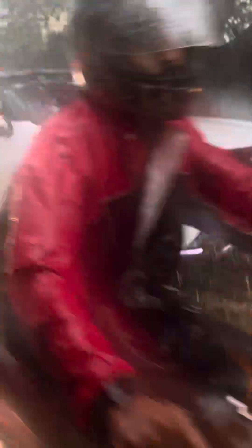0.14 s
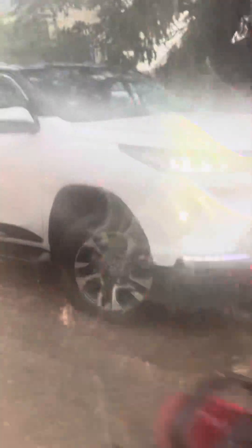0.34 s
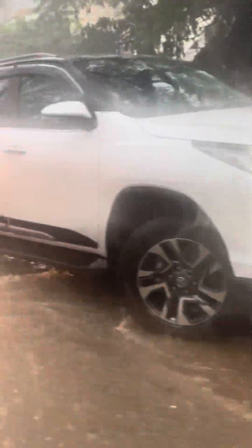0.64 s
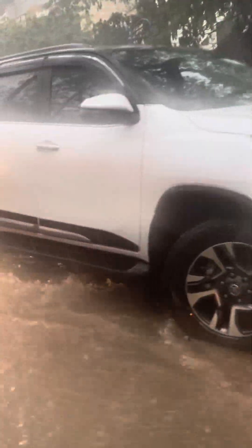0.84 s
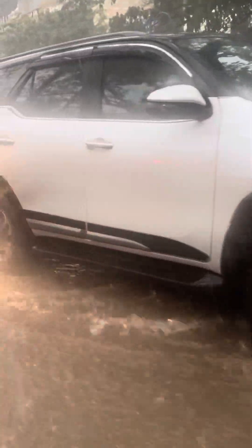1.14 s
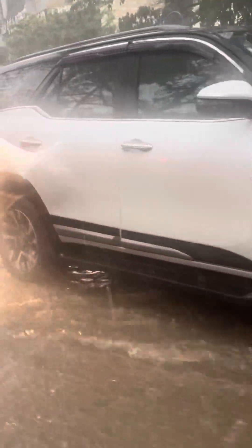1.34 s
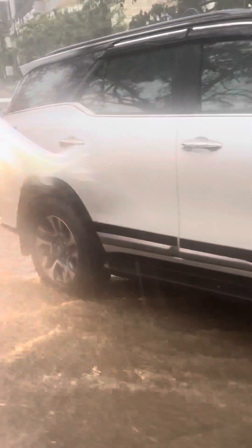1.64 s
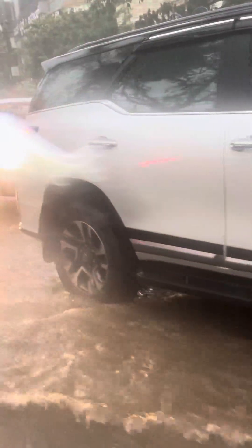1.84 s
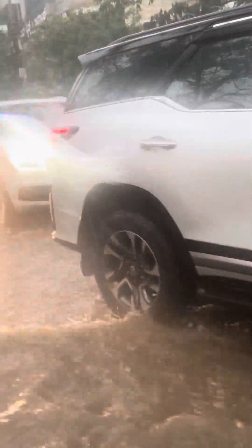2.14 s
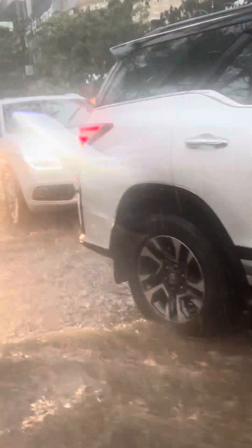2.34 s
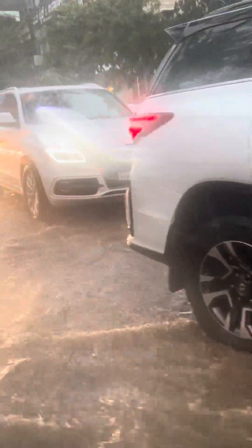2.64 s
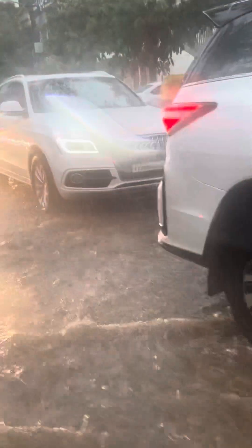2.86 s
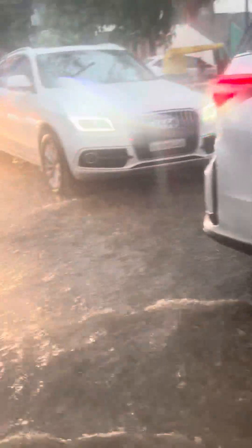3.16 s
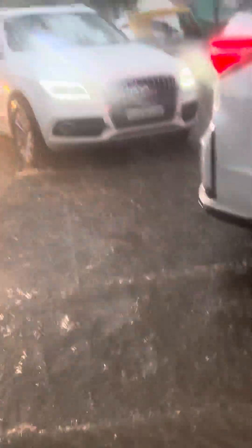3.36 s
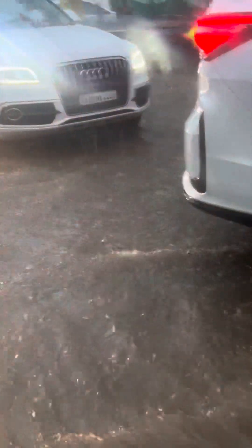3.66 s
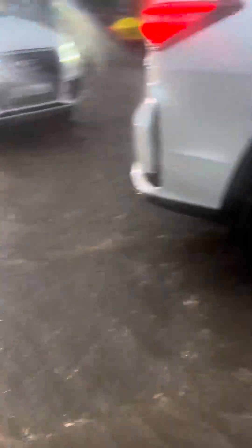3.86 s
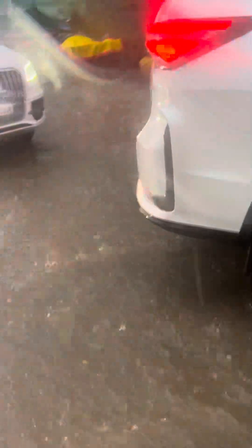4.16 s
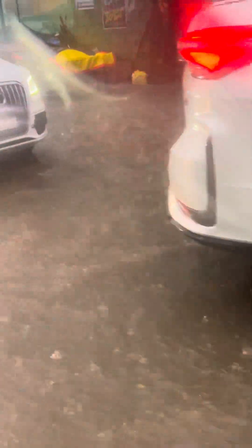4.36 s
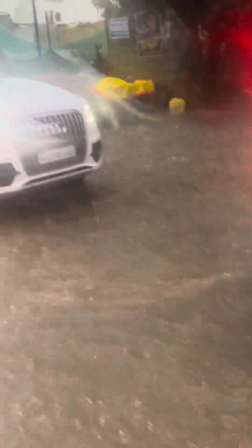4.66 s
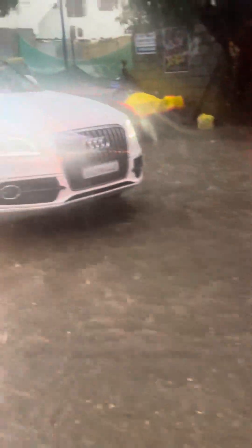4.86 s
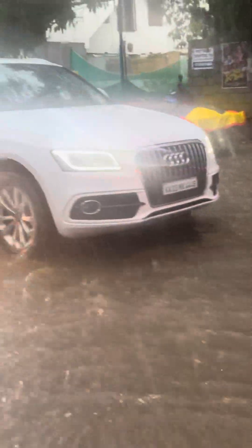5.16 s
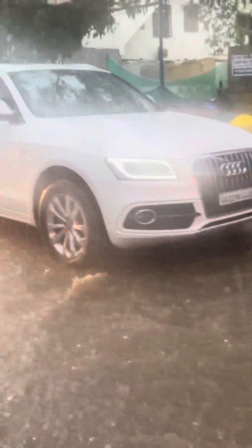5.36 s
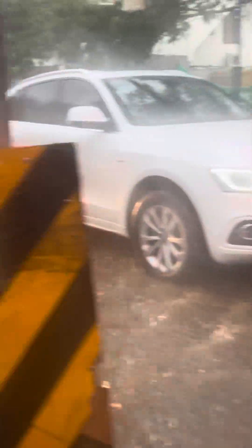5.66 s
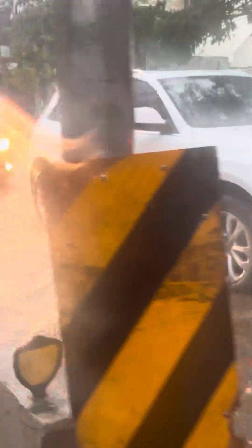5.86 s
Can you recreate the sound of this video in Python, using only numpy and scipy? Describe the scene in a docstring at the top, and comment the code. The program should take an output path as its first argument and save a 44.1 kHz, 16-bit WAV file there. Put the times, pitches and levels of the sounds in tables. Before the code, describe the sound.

Rain and sloshing floodwater make a steady, muffled wash around a microphone inside a slowly moving vehicle, its engine droning through the floor and drops pattering on the bodywork. Early on a motorcycle pulls away, a few soft thumps come from below and a faraway horn holds a thin note. A car passes with a low hum, a heavy drop smacks the panel, then a full, nearby horn sounds once before further drops and a thump.

```python
"""Rain on a flooded street from inside a slow vehicle, dull and boomy through the bodywork.
Throughout, tyres push through water, the engine drones and drops chirp on a body panel.
A motorcycle leaves at the start and a car passes (0.4-3.9 s); the floor bumps (0.5-1 s) as a thin
far horn sounds (0.6-1.7 s). The largest drop snaps at 2.9 s. A full near horn buzzes (4.5-5.2 s),
then come more large drops and a last bump."""
import sys
import numpy as np
from scipy import signal
from scipy.fft import rfft, irfft, next_fast_len
from scipy.io import wavfile
from scipy.ndimage import uniform_filter1d

SR = 44100
rng = np.random.default_rng(int(sys.argv[2]) if len(sys.argv) > 2 else 0)


def put_to_file(sound):
    """Save the sound as 16-bit audio at rate SR, in the file named by the first command-line argument."""
    columns = np.atleast_2d(sound).T  # one column per channel
    safe = np.clip(columns, -1, 1)
    whole_steps = np.round(safe * 32767)
    wavfile.write(sys.argv[1], SR, whole_steps.astype(np.int16))


N = 264730

# phase lead of the left microphone: f/Hz, lead/rad
LEFT_LEAD = [(0, -1.5), (250, 0.22), (600, 2), (860, 2.5), (1550, 5), (2150, 8), (2600, 10), (3500, 6.5),
             (4390, 7.5), (5500, 9), (6400, 11), (7500, 12.5), (9200, 14.5)]


def amp(db):
    return 10 ** (np.asarray(db) / 20)


def unit_rms(x):
    return x / np.sqrt(np.mean(x ** 2) + 1e-20)


def at_hz(rows, hz):
    """Table value at hz, on a log frequency axis."""
    f, value = np.transpose(rows)
    return np.interp(np.log(hz + 1), np.log(f + 1), value)


def at_times(rows, t):
    """Table columns at times t."""
    times, *cols = np.transpose(rows)
    return [np.interp(t, times, c) for c in cols]


def curves(rows):
    """Start/s and per-sample columns of a time table."""
    t = np.arange(rows[0][0], rows[-1][0], 1 / SR)
    return t[0], at_times(rows, t)


def add(mix, start_s, sound):
    part = mix[:, round(start_s * SR):][:, :sound.shape[1]]
    part += sound[:, :part.shape[1]]


def drift(size, top_hz):
    """Random wander, rms 1, up to top_hz."""
    t = np.arange(size) / SR
    rates_hz = np.geomspace(top_hz / 8, top_hz, 8)
    return unit_rms(sum(np.sin(2 * np.pi * (f * t + rng.random())) for f in rates_hz))


def partial(k, hz, db, pan_db, lead_rad=None, start_turns=None):
    """Stereo harmonic k of a pitch curve; pan is left minus right."""
    phase = 2 * np.pi * (k * np.cumsum(hz) / SR + (rng.random() if start_turns is None else start_turns))
    if lead_rad is None:
        lead_rad = at_hz(LEFT_LEAD, k * np.mean(hz))
    left = amp(db + pan_db / 2) * np.sin(phase + lead_rad / 2)
    right = amp(db - pan_db / 2) * np.sin(phase - lead_rad / 2)
    return np.sqrt(2) * np.array([left, right])


def cabin(common, separate):
    """Two independent noises, dulled by the bodywork and made partly coherent."""
    colour = [(20, -42), (40, -10.5), (70, -1), (130, -10), (280, -14.5), (380, -20.5), (750, -17.5),
              (1150, -21), (1500, -24), (2450, -40), (4700, -53), (6600, -63), (9500, -72.5),
              (10300, -88.5), (13500, -102)]  # spectrum: f/Hz, relative density/dB
    resonances = [(944, 77, 6), (5500, 210, -10.5)]  # cabin ring and shadow: f/Hz, width/Hz, gain/dB
    coherence = [(60, 0.94), (110, 1), (200, 0.69), (370, 0.79), (680, 0.041), (1250, 0.073), (2290, 0.57),
                 (4200, 0.21), (5200, 1), (6200, 0.5), (7500, 0.97), (9000, 0.52)]  # f/Hz, left-right coherence
    balance = [(60, -2), (120, 3), (250, 3.5), (500, 7), (1020, 4.5), (2070, -1.5), (4200, 1.5),
               (5500, -1.5), (8000, 1)]  # f/Hz, pan/dB
    size = next_fast_len(N)
    common, separate = rfft(common, size), rfft(separate, size)
    hz = np.fft.rfftfreq(size, 1 / SR)
    db = at_hz(colour, hz) + sum(gain / (1 + ((hz - f) / width) ** 2) for f, width, gain in resonances)
    alike, pan_db = at_hz(coherence, hz), at_hz(balance, hz)
    lagged = common * np.exp(-1j * at_hz(LEFT_LEAD, hz))
    left = common * amp(db + pan_db / 2)
    right = (alike * lagged + np.sqrt(1 - alike ** 2) * separate) * amp(db - pan_db / 2)
    return irfft(np.array([left, right]), size)[:, :N]


def water(level_db=-26.5, patchy_db=1.57, flicker_db=1.0):
    """Rain and tyre noise: four bands swell apart, splashes flicker the treble."""
    levels = [(0.0, -8, -3, 8), (0.141, -5, -6, 7), (0.165, -3.5, 2, 12.5), (0.19, -6.5, -3, 6.5),
              (0.33, -6, -3, 6.5), (0.45, -2, -2, 5.5), (0.56, -0.5, 4, 6.5), (0.74, 0.5, 5.5, 4.5),
              (0.9, 0.5, 1.5, 3.5), (1.03, 1.5, 0.5, 2), (1.17, -3, 2, 0.5), (1.8, 0.5, -1, 0),
              (2.6, -0.5, 1.5, -0.5), (3.4, -1.5, -1, -0.5), (4.2, -1, -1, -0.5), (4.499, 1, 2, 0.5),
              (4.75, 1, 1.5, 3.5), (5.2, 1.5, 1.5, 2), (5.4, -0.5, -1.5, 2.5), (5.7, 0.5, 3, 1),
              (6.0, 2, -1.5, 2.5)]  # t/s, slosh/dB, tyre wash/dB, spray/dB (relative)
    centres_hz = (250, 900, 2100, 7000)  # slosh, wash, spray and hiss bands
    weights = [(1, 0.096, 0), (0.07, 0.97, 0.067), (0.15, 0.017, 1), (0, 0.12, .8)]  # per band: share of slosh, wash, spray level
    frames, hz = N // 128 + 5, np.fft.rfftfreq(512, 1 / SR)
    swell_db = np.array(weights) @ at_times(levels, np.arange(frames) * 128 / SR)
    bands = np.array([at_hz(list(zip(centres_hz, row)), hz) for row in np.eye(4)])
    patches = uniform_filter1d(rng.standard_normal((frames, 257)), 24, axis=0)
    patches = unit_rms(uniform_filter1d(patches, 8, axis=1)).T
    flicker = unit_rms(uniform_filter1d(rng.standard_normal(frames), 12)) * bands[2][:, None]
    gain = amp(bands.T @ swell_db + patchy_db * patches + flicker_db * flicker)
    spectra = rng.standard_normal((2, frames, 257, 2)) @ [1, 1j]
    _, noises = signal.istft(spectra.transpose(0, 2, 1) * gain, nperseg=512, noverlap=384)
    return amp(level_db) * unit_rms(cabin(*noises[:, :N]))


def patter(drops_per_s=24, smallest_db=-44, spread_db=3):
    """Small drops hit three spots of the panel at random, a few harder."""
    out = 0
    for pan_db, speed in ((-5, .85), (0, 1.2), (5, 1.)):
        sizes = amp(spread_db * np.minimum(rng.exponential(1, N), 2.5))
        hits = sizes * (rng.random(N) < drops_per_s / 3 / SR)
        drop = drop_snap(smallest_db, -4, -30, pan_db, speed)
        out = out + signal.oaconvolve(hits[None], drop, axes=1)[:, :N]
    return out


def engine(cycle_hz, orders, waver_db):
    """Slightly unsteady orders (k, level/dB), in step so that they throb once a cycle."""
    n = len(cycle_hz)
    hz = cycle_hz * (1 + .005 * drift(n, 12))
    sound = 0
    for k, db in orders:
        level_db = db + waver_db * drift(n, 6)
        sound = sound + partial(k, hz, level_db, pan_db=.91, start_turns=.77 + .055 * drift(n, 4))
    return sound * signal.windows.tukey(n, .03)


def motorcycle():
    """One firing tone that swells and leaves."""
    firing = [(0, 91.4, -38), (.1, 96, -36), (.25, 91.6, -26), (.4, 96.8, -31.5), (.5, 91.2, -36),
              (.75, 87, -55)]  # t/s, f/Hz, level/dB
    start_s, (hz, db) = curves(firing)
    return start_s, engine(hz, [(1, db)], waver_db=1.5)


def passing_car():
    """Speeds up, then lifts off; each order swells as it crosses the body's boom near 100 Hz."""
    drive = [(0.4, 13.3, -10), (0.7, 17, 0), (1.0, 17.1, 1.5), (1.12, 17.2, -21), (1.3, 20.5, -7),
             (1.6, 18.4, -1.5), (2.3, 22, -1.5), (2.68, 23.7, 0), (2.8, 25, -11), (3.3, 21, -10),
             (3.85, 16.8, -9)]  # t/s, cycle rate/Hz, load/dB
    orders = [(4, -35), (5, -29.5), (6, -33)]  # order, base level/dB
    body_boom = [(50, -22), (70, -11), (88, 1.5), (105, 2.5), (118, -3.5), (128, -12), (145, -9)]  # body boom: f/Hz, gain/dB
    start_s, (hz, load_db) = curves(drive)
    pulling = [(k, db + load_db + at_hz(body_boom, k * hz)) for k, db in orders]
    fading_db = -32.2 - 14 * np.arange(len(hz)) / SR  # extra order 4, independent of load
    return start_s, engine(hz, pulling + [(4, fading_db)], waver_db=1.5)


def own_engine():
    """Heard through the floor: upper orders follow the load, order 2 booms at times."""
    drive = [(0.0, 20.07, -14, -51), (0.3, 21.48, -2.5, -37), (0.6, 20.87, -3.5, -55),
             (0.9, 21.57, -8, -49), (1.2, 22.46, -7, -43.5), (1.9, 22.66, -6, -51),
             (2.15, 22.73, -0.5, -27.5), (2.3, 22.87, 2.5, -27), (2.45, 22.65, -3.5, -35.5),
             (2.7, 22.69, -8, -36.5), (2.82, 22.72, 6.5, -27), (3.15, 21.21, -1.5, -31.5),
             (3.6, 20.5, -2, -41), (4.0, 21.57, -1, -43), (4.35, 22.36, 1.5, -36),
             (4.7, 23.39, -2.5, -37.5), (5.3, 26.26, 1.5, -37), (5.55, 25.43, 1, -38),
             (5.75, 24.05, -1.5, -46), (6.0, 22.9, 12, -22)]  # t/s, cycle rate/Hz, load/dB, order 2 level/dB
    orders = [(3, -30.5), (4, -40), (5, -35), (6, -39), (8, -45)]  # order, base level/dB
    floor = [(40, 0), (108, 1), (122, -4), (160, -5)]  # transmission: f/Hz, gain/dB
    start_s, (hz, load_db, boom_db) = curves(drive)
    upper = [(k, db + load_db + at_hz(floor, k * hz)) for k, db in orders]
    return start_s, engine(hz, [(2, boom_db)] + upper, waver_db=2.5)


def floor_bump(db, hz, t60_s, rise_s=.0052):
    """A soft push rings the floor briefly."""
    t = np.arange(8000) / SR
    envelope = amp(db - 60 * t / t60_s) * (1 - np.exp(-t / rise_s))
    return envelope * np.sin(2 * np.pi * hz * t) * amp([[5.], [4.]])  # left, right gain


def horn_press(on_s, off_s, pitch_hz, offset_hz, attack_s, sag_db, release_db, release_s,
               tail_db_per_s, rise_hz):
    """Times, pitch and gain of a horn: attack, hold, release, street tail."""
    t = np.arange(on_s, off_s + .2, 1 / SR)
    held = np.minimum((t - on_s) / (off_s - on_s), 1)
    hz = pitch_hz + offset_hz * np.exp(-(t - on_s) / .017) + rise_hz * held
    corners_s = [on_s, on_s + attack_s, off_s, off_s + release_s]
    db = np.interp(t, corners_s, [-25, 0, sag_db, sag_db + release_db])
    return t, hz, db + tail_db_per_s * np.maximum(t - off_s - release_s, 0)


def fading_partials(partials, hz, gain_db, fade_db, fade_hz):
    """Partials (k, level/dB) that fade and pan at random."""
    n = len(hz)
    return sum(partial(k, hz, gain_db + db + fade_db * drift(n, fade_hz), pan_db=4 * drift(n, fade_hz))
               for k, db in partials)


def far_horn():
    """A small disc horn, strongest near 3 kHz, fluttering with distance."""
    press = (.592, 1.66, 433.2, -1.5, .025, 0, -9, .035, -110, .2)  # arguments of horn_press
    weak = [(1, -46), (10, -71), (19, -95), (20, -75.5), (21, -89), (22, -93)]  # partial, level/dB
    gains = [(6, 8.5), (7, 7), (8, 2.5), (9, 4)]  # strong partial, gain/dB
    fades = [(0.62, -52, -57, -56, -67), (0.64, -48, -56, -52, -70), (0.682, -62, -56, -59, -68),
             (0.738, -50, -54, -50.5, -72), (0.766, -55, -59, -56, -70), (0.834, -56, -52, -57, -68),
             (0.866, -60, -56, -54, -74), (0.892, -51, -56, -53, -67), (0.92, -58, -45, -54, -65),
             (0.95, -56, -49, -61, -71), (0.978, -58, -51, -49, -70), (1.016, -72, -53, -61, -77),
             (1.042, -60, -55, -45.5, -80), (1.102, -65, -48, -69, -67), (1.128, -61, -53.5, -51, -69),
             (1.198, -54, -53, -55, -80), (1.218, -51, -50, -58, -71), (1.256, -64, -53, -46.5, -68),
             (1.288, -50, -48.5, -51, -72), (1.32, -57, -57, -62, -73), (1.344, -65, -51.5, -57, -76),
             (1.406, -61, -50, -58, -67), (1.448, -54, -50, -48, -70), (1.468, -60, -47, -56, -74),
             (1.558, -67, -49, -58, -59), (1.596, -54, -50, -48, -71), (1.636, -56, -56, -45.5, -56),
             (1.66, -68, -60, -53.5, -69)]  # t/s, base level/dB of partials 6, 7, 8, 9
    t, hz, press_db = horn_press(*press)
    hz = hz * (1 + .0034 * drift(len(t), 48))
    strong = [(k, gain_db + db) for (k, gain_db), db in zip(gains, at_times(fades, t))]
    tones = fading_partials(weak, hz, press_db, fade_db=3.8, fade_hz=28)
    tones += fading_partials(strong, hz, press_db, fade_db=2.6, fade_hz=60)
    return t[0], tones * signal.windows.tukey(len(t), .03)


def near_horn():
    """A buzzing diaphragm; low partials swell apart as direct sound and street echoes interfere."""
    press = (4.53, 5.215, 438.05, -12, .016, 0, -11, .045, -130, 1.0)  # arguments of horn_press
    low_partials = [(1, -1.5, -.3), (2, 3.5, -1.33), (3, 1.5, 0), (4, 4, 1.3), (5, 8, 1.97)]  # partial, gain/dB, left lead/rad
    top_partials = [(6, -46), (7, -52), (8, -56), (9, -59), (10, -63.5), (11, -64), (12, -69.5),
                    (13, -67.5), (14, -70), (15, -74), (16, -78.5), (17, -77.5), (18, -80), (19, -88),
                    (20, -88)]  # partial, base level/dB
    # partials 1-5: t/s, base level/dB, pan/dB
    swell_1 = [(4.57, -24, 9.5), (4.638, -20.5, 8.5), (4.732, -22, 12.5), (4.938, -22, 7),
               (5.012, -23.5, 4.5), (5.2, -24, 6)]
    swell_2 = [(4.57, -26.5, 3), (4.592, -29, 0.5), (4.678, -24, 3.5), (4.754, -34, -5), (4.784, -46, 0),
               (4.824, -23.5, 6.5), (4.854, -21.5, 8.5), (4.896, -24, 11), (4.941, -37, 20.5),
               (4.998, -40, -4), (5.118, -23.5, 8.5), (5.2, -24, 7)]
    swell_3 = [(4.57, -24, 6), (4.604, -26.5, 2), (4.656, -31.5, 12.5), (4.698, -22.5, 3),
               (4.792, -27, 7.5), (4.84, -27, -4), (4.888, -33.5, 18.5), (4.946, -22, 5.5), (5.0, -37, 21),
               (5.068, -28.5, 7), (5.096, -37, -11.5), (5.124, -54, 4.5), (5.162, -31.5, 18),
               (5.2, -36.5, 5)]
    swell_4 = [(4.57, -40, -3.5), (4.718, -37.5, 0.5), (4.744, -49, -3), (4.808, -40.5, -13.0),
               (4.838, -49, -11), (4.876, -35.5, -11), (4.92, -32, -2), (4.954, -49, 3),
               (4.99, -30.5, -0.5), (5.012, -56.5, 2.5), (5.074, -38.5, -14), (5.124, -41.5, 1),
               (5.156, -40, -11), (5.2, -37.5, -2)]
    swell_5 = [(4.57, -42, 2), (4.64, -50, 3.5), (4.69, -68, -1), (4.718, -52, 5.5), (4.758, -61, -1.5),
               (4.788, -39, -3), (4.824, -47, 2), (4.856, -63, 6), (4.876, -52, 4), (5.01, -51.5, 3),
               (5.086, -44, 4), (5.132, -49.5, 2), (5.158, -41, 4), (5.199, -54, 5)]
    t, hz, press_db = horn_press(*press)
    low = 0
    for (k, gain_db, lead_rad), swell in zip(low_partials, (swell_1, swell_2, swell_3, swell_4, swell_5)):
        db, pan_db = at_times(swell, t)
        flutter_db = .92 * drift(len(t), 70)
        low = low + partial(k, hz, db + gain_db + press_db + flutter_db, pan_db, lead_rad)
    top_db = press_db + 1 - 3.5 * (t - t[0])
    top = fading_partials(top_partials, hz, top_db, fade_db=3.5, fade_hz=20)
    return t[0], (low + top) * signal.windows.tukey(len(t), .03)


def drop_snap(db, tick_db, fizz_db, pan_db, speed):
    """Panel bending waves arrive treble first: a chirp falls into a low ring; airborne tick and fizz."""
    # left, right at speed 1: delay/s, sweep/Hz, end/Hz, fall/s, fall shape, swell/s, swell shape
    panel = [(.00011, 1973, 395, .00194, 2.8, .00153, 3.5),
             (.000572, 4589, 259, .000995, 1.079, .00157, 5.9)]
    t = np.arange(2000) / SR
    chirps = []
    for delay_s, sweep_hz, end_hz, fall_s, fall_shape, swell_s, swell_shape in panel:
        age = np.maximum(t * speed - delay_s, 0)
        hz = end_hz + sweep_hz * np.exp(-(age / fall_s) ** fall_shape)
        swell = (age / swell_s * np.exp(1 - age / swell_s)) ** swell_shape
        ring = .55 * np.exp(-age / .008) * (1 - np.exp(-(age / .0025) ** 2))
        chirps.append(-(swell + ring) * np.sin(2 * np.pi * np.cumsum(hz * (age > 0)) * speed / SR))
    spray = .14 * np.exp(-((t - .0016) / .00071) ** 2) + .04 * (t > .002) * np.exp(-t / .007)
    burst = spray * rng.standard_normal((2, len(t)))
    burst[:, 70] -= 1  # impact at 1.6 ms
    tick = signal.lfilter(*signal.butter(3, [1900, 4400], "bandpass", fs=SR), burst)
    fizz = signal.lfilter(*signal.butter(2, [5200, 8800], "bandpass", fs=SR), burst)
    gain = amp(db + pan_db * np.array([[.5], [-.5]]))
    return gain * (np.array(chirps) + amp(tick_db) * tick + amp(fizz_db) * fizz)


def scene():
    snaps = [(0.111, -34, 2, -27, -1, 1.15), (0.1443, -30, 3, -28, -2, 1.3),
             (0.2472, -18.5, 3, -30, 0, 0.78), (0.4183, -26, -6, -30, 7, 0.86),
             (2.8818, -3.3, -17, -33, -2.7, 0.97), (3.789, -40, -18, -20, 2, 1.27),
             (4.001, -24.5, -22, -40, 6, 0.74), (4.1114, -28, 4, -28, 2, 0.93),
             (4.788, -17, -2, -30, -4, 1.02), (5.3806, -18.5, -1.5, -23, -3, 0.9),
             (5.44, -24, -28, -43, 9, 0.67), (5.4673, -17.5, 5.5, -8, -4, 0.79),
             (5.6274, -31, -5, -28, -1, 1.12)]  # single drops, large and small: t/s, level/dB, tick gain/dB, fizz gain/dB, pan/dB, chirp speed
    bumps = [(0.546, -12, 76, 0.076), (0.91, -15, 92, 0.12), (0.966, -17, 110, 0.083),
             (4.791, -17.5, 252.1, 0.072), (5.485, -10, 72, 0.08), (2.886, -25, 185, 0.1),
             (1.003, -13, 205, 0.06), (1.003, -22, 370, 0.05)]  # floor: t/s, base level/dB, f/Hz, t60/s
    mix = water() + patter()
    for source in (own_engine, passing_car, motorcycle, near_horn, far_horn):
        add(mix, *source())
    for start_s, *snap in snaps:
        add(mix, start_s, drop_snap(*snap))
    for start_s, *bump in bumps:
        add(mix, start_s, floor_bump(*bump))
    return mix


def record(dry):
    """Low-pass at 16 kHz."""
    lowpass = signal.firwin(511, 16000, window=("kaiser", 9), fs=SR)
    return signal.oaconvolve(dry, lowpass[None], "same")


dry = scene()
out = record(dry)
put_to_file(out)
```